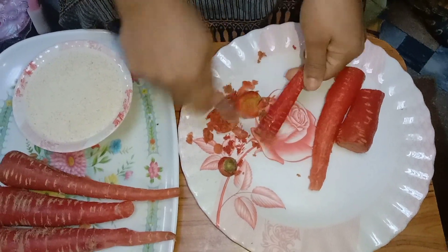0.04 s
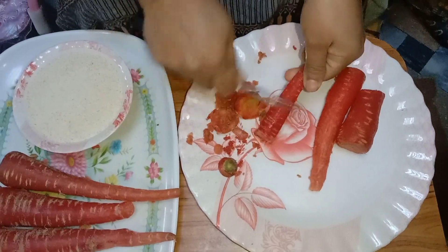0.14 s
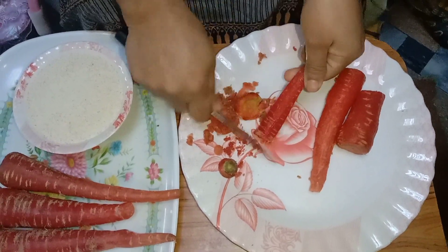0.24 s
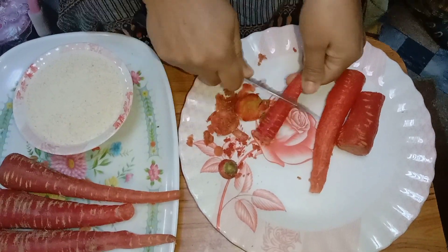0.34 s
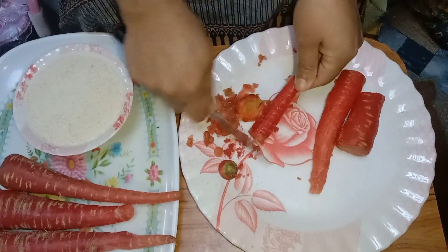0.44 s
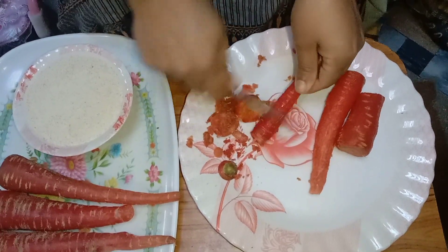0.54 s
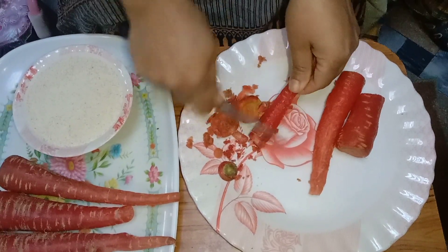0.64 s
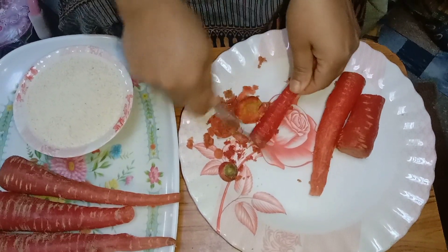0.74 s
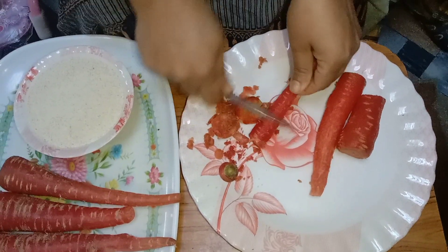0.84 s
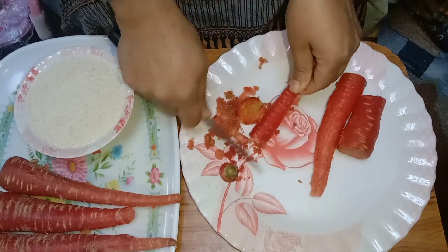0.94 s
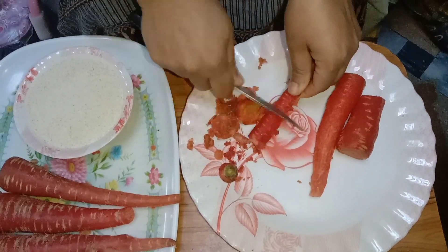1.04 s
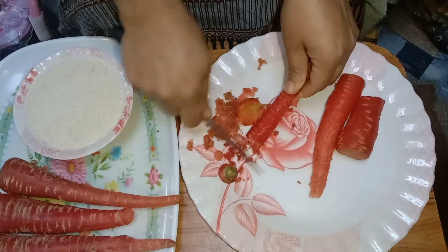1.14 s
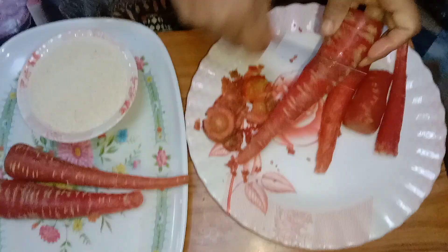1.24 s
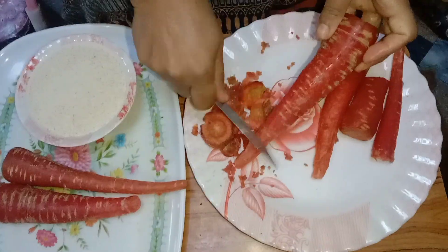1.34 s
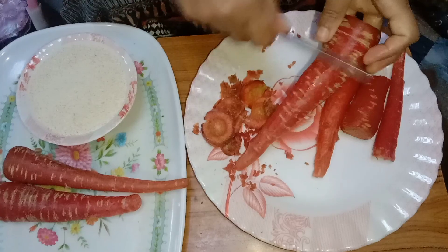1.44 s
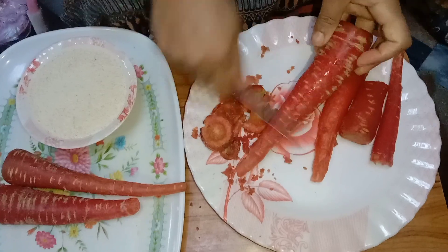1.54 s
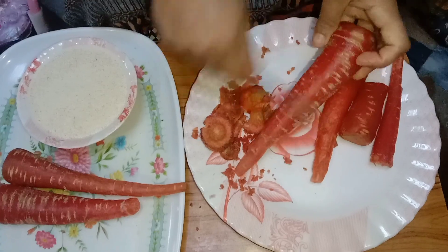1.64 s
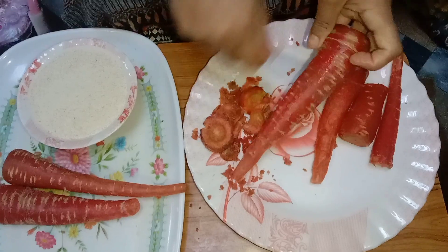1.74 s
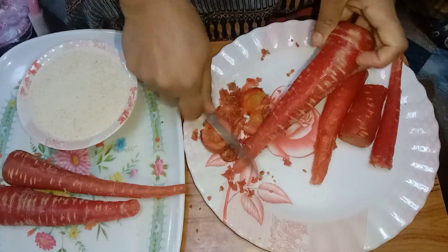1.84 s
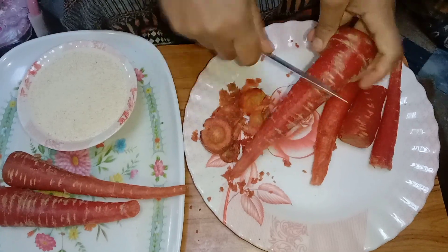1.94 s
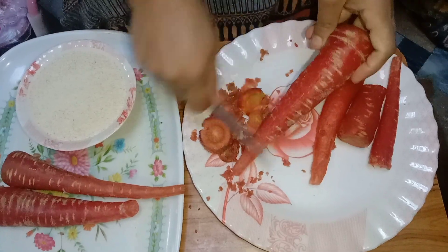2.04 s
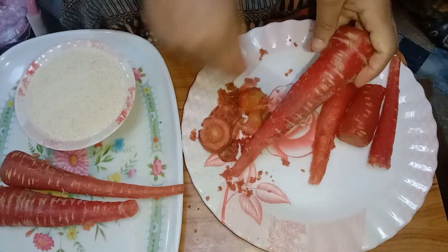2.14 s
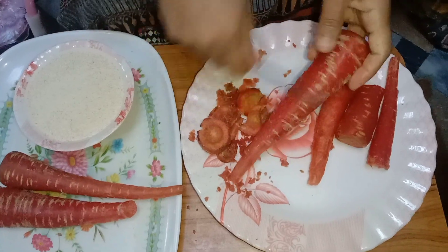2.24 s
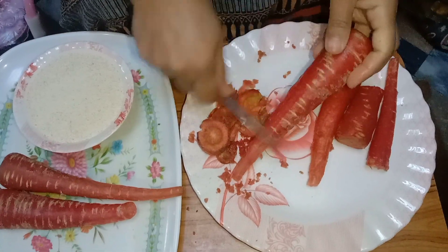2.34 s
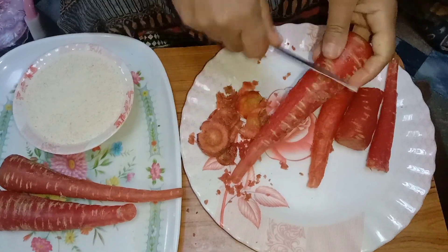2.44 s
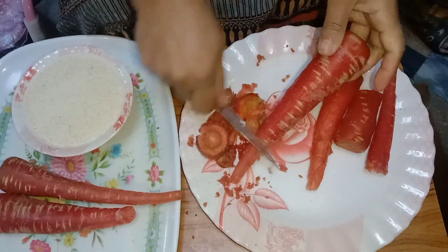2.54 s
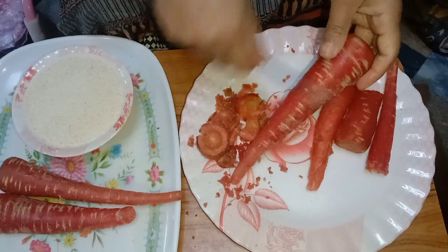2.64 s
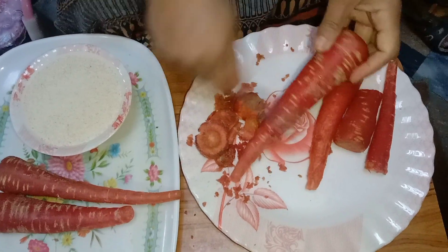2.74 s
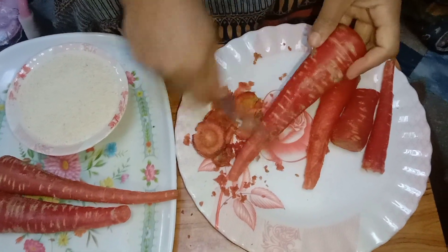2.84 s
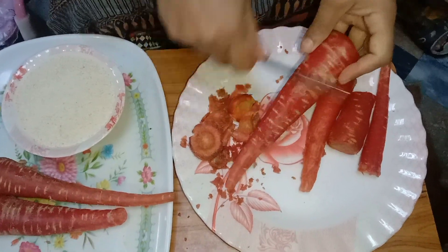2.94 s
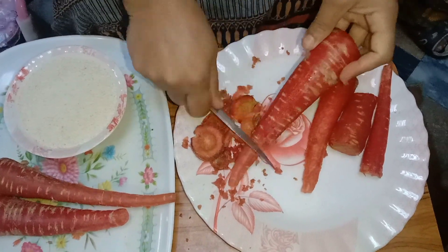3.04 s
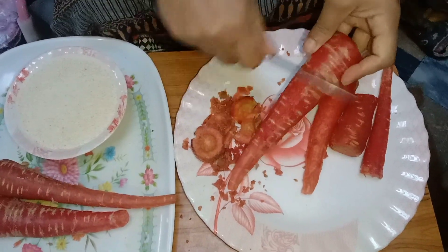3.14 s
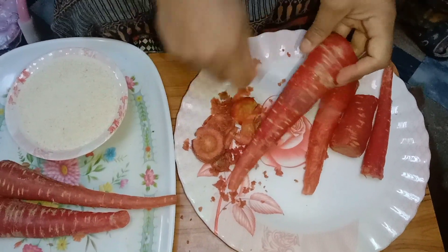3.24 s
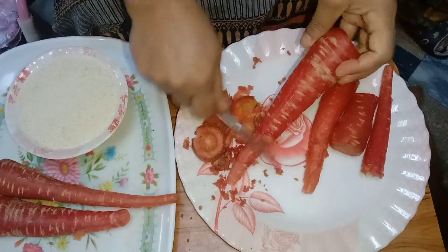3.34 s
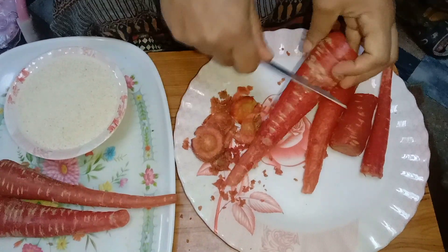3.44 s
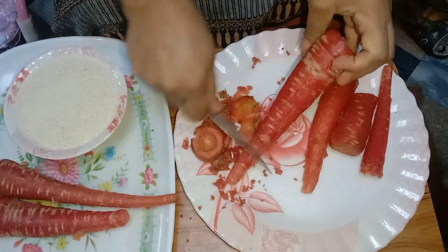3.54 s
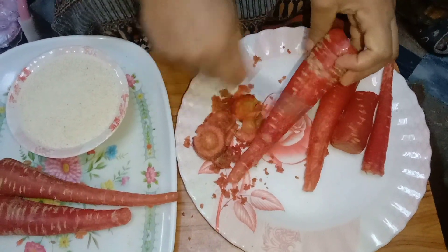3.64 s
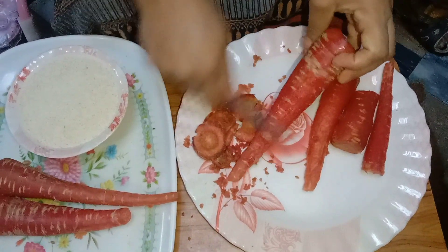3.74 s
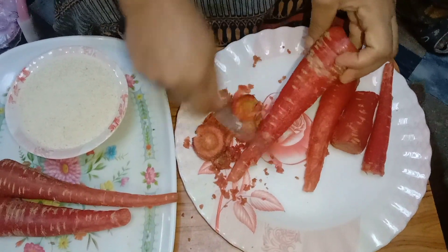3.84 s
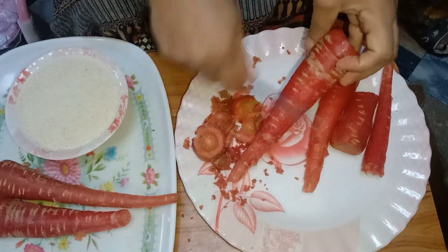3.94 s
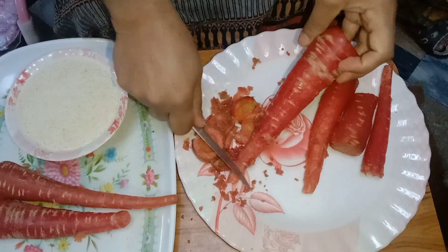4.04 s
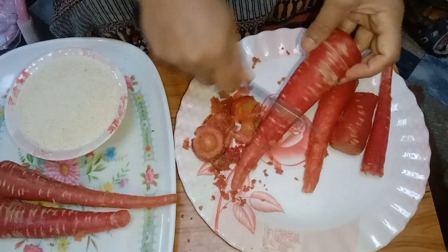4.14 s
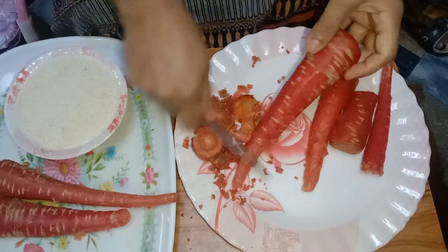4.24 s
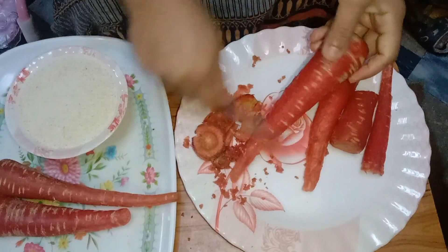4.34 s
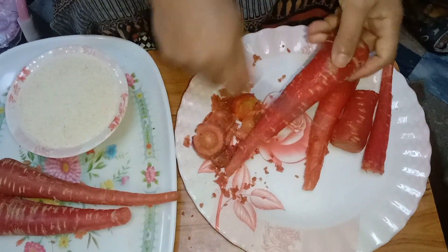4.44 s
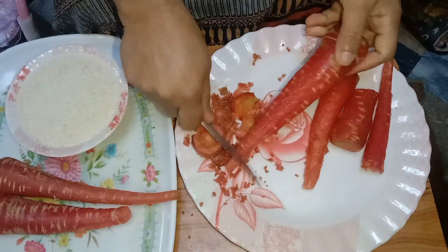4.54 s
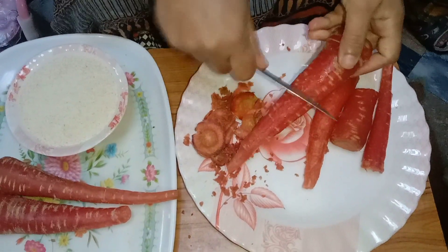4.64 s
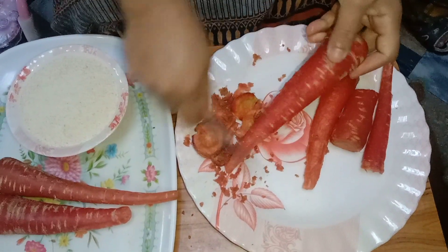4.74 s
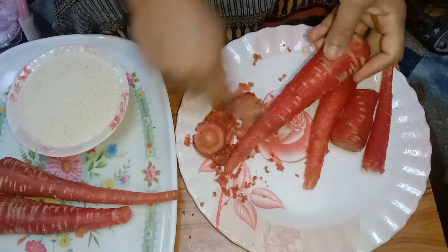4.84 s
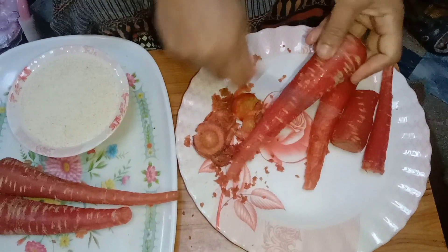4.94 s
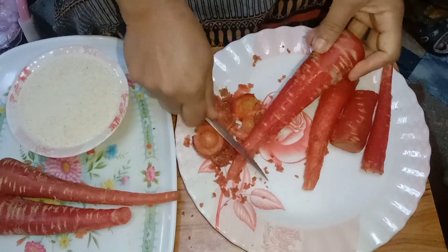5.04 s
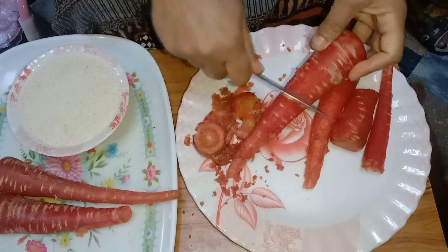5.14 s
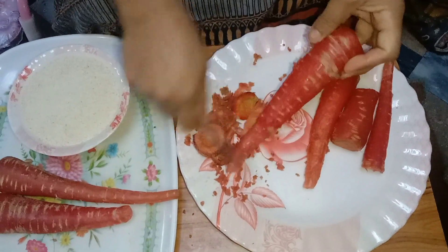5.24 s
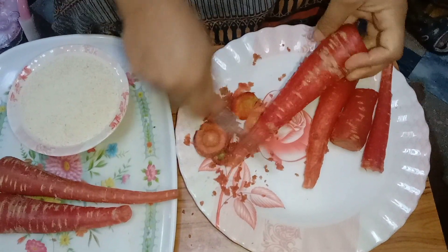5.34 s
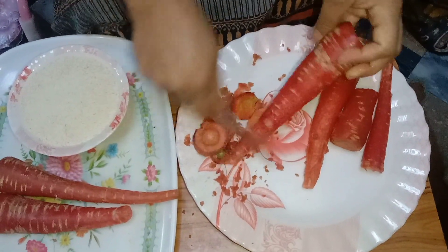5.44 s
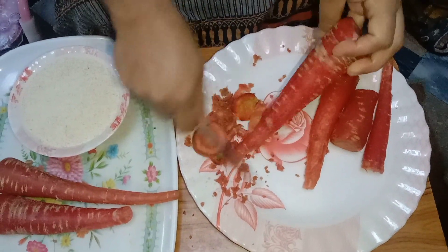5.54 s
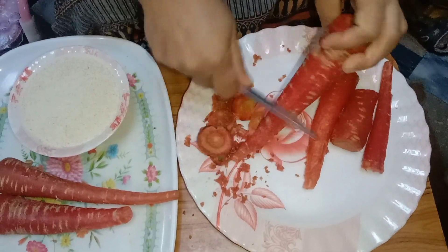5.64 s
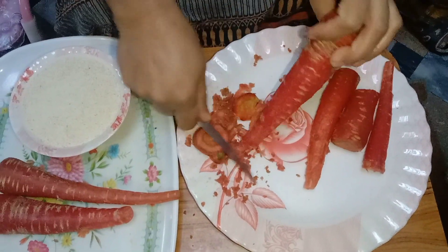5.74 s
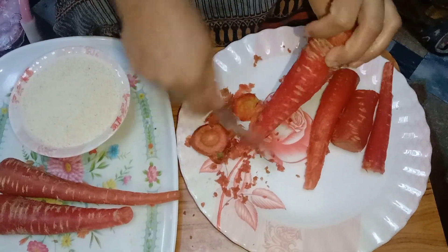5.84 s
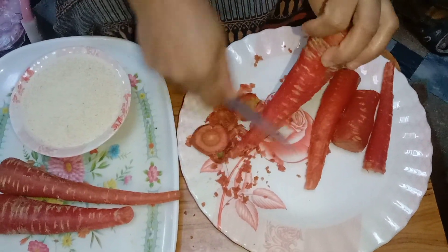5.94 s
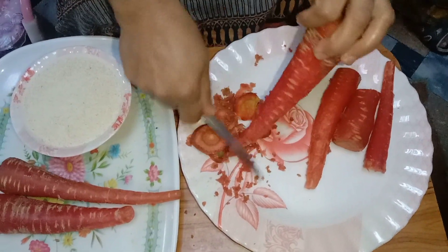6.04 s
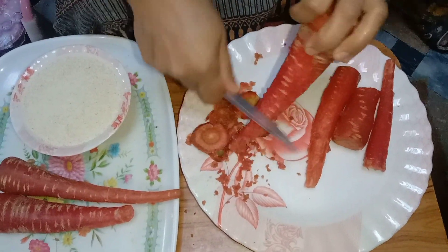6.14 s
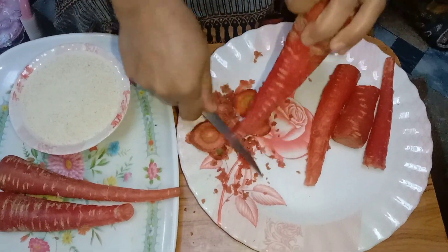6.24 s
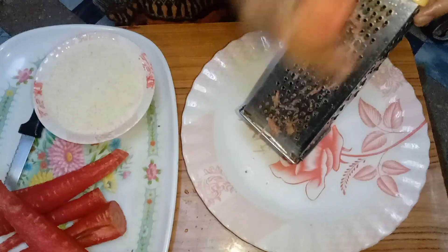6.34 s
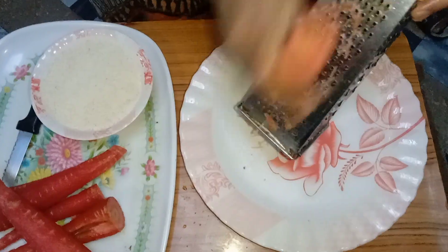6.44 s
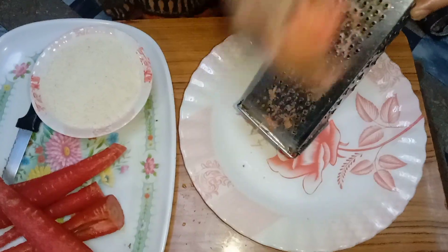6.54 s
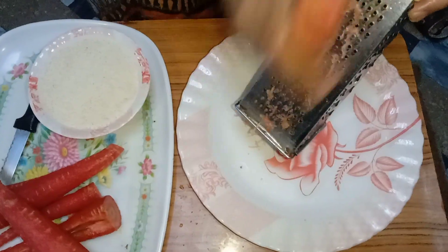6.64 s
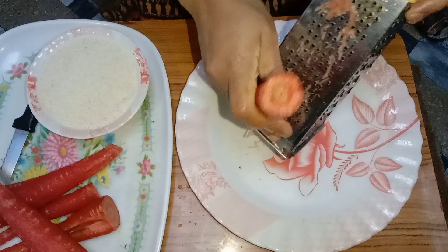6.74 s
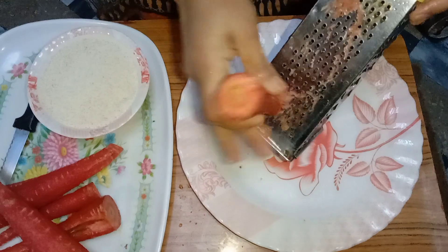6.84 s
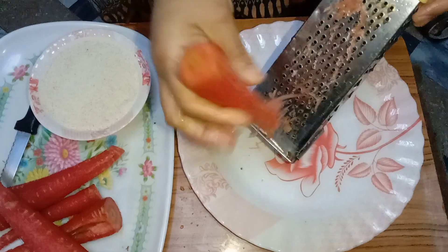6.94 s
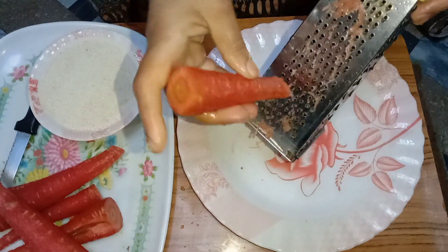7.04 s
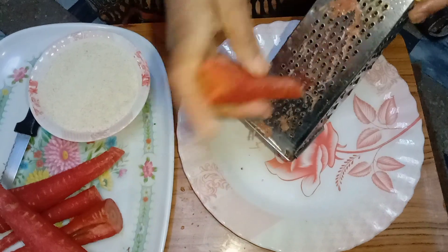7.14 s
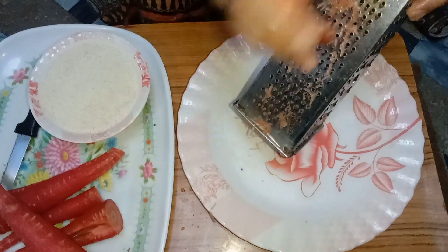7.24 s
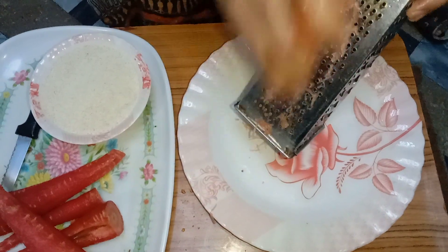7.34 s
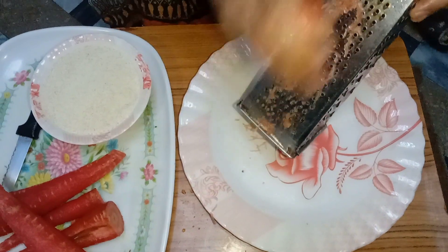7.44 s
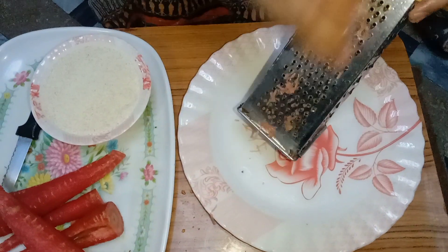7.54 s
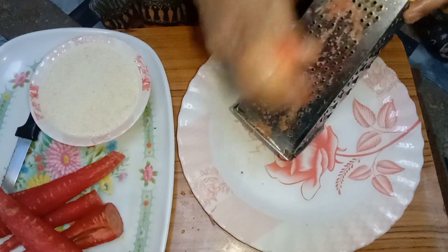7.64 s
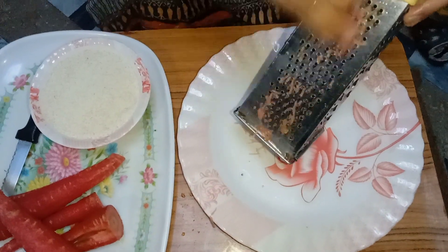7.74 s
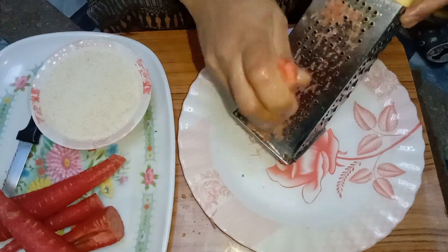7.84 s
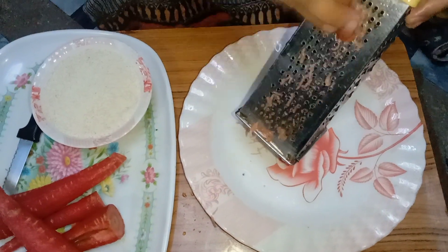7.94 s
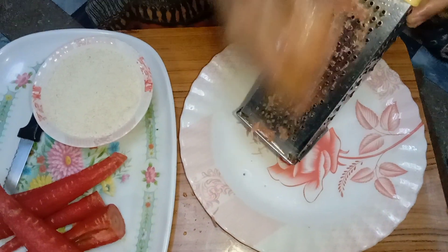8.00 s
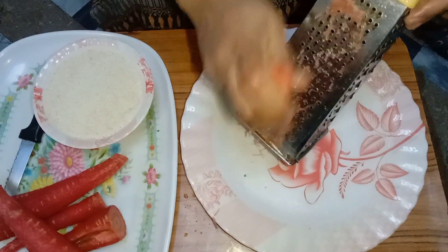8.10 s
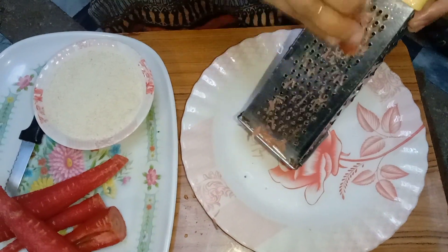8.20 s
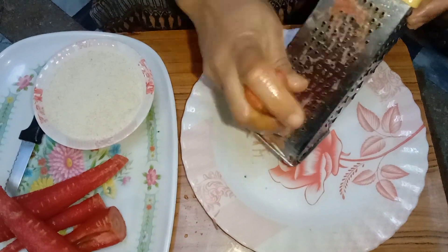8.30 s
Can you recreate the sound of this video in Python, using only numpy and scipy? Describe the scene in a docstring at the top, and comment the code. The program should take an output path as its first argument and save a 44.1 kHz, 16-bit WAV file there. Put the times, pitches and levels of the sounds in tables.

```python
"""A knife scrapes the skin off carrots over a plastic plate, about four strokes a second: torn fibres hiss,
the carrot resonates with the force and the knife's tip rumbles on the plate; light drags and small clicks join in.
Then a carrot is rubbed up and down a sheet-metal grater: noise through the teeth drives the sheet's modes,
and its foot knocks on the plate. Small dry kitchen as decaying noise bands, very low filtered-noise background,
close microphone with a bright resonance."""
import sys
import numpy as np
from scipy import signal
from scipy.fft import rfft, irfft
from scipy.io import wavfile
from scipy.ndimage import uniform_filter1d

SR = 44100
rng = np.random.default_rng(int(sys.argv[2]) if len(sys.argv) > 2 else 0)


def ratio_of_db(decibels):
    """Turn decibels (scalar or array-like) into linear amplitude factors; 0 dB maps to 1."""
    return 10 ** (np.asarray(decibels, float) / 20)


def pcm_store(signal):
    """Save signal as 16-bit PCM."""
    levels = np.round(np.clip(np.atleast_2d(signal), -1, 1) * 32767)
    wavfile.write(sys.argv[1], SR, levels.astype(np.int16).T)


N = 369116


def rms_one(x):
    """Normalisation: scale to unit rms."""
    return x / np.sqrt(np.mean(x ** 2) + 1e-20)


def at_hz(points, hz):
    """Interpolation: read a table on a log-frequency axis."""
    table_hz, values = np.array(points).T
    return np.interp(np.log(np.maximum(hz, 1)), np.log(table_hz), values)


def coloured(x, spectrum, unit=True, size=4096):
    """Minimum-phase filtering: causal filter with the given dB spectrum; unit gain for noise if asked."""
    log_gain = at_hz(spectrum, np.arange(size // 2 + 1) * SR / size) * np.log(10) / 20
    cepstrum = irfft(log_gain)
    cepstrum[1:size // 2] *= 2   # folding the cepstrum forward makes the filter causal
    cepstrum[size // 2 + 1:] = 0
    response = irfft(np.exp(rfft(cepstrum)))
    if unit:
        response = response / np.linalg.norm(response)
    return signal.fftconvolve(x, response)[:N]


def resonate(x, modes):
    """Modal superposition: parallel resonances, unit gain for noise; x may hold one row per mode."""
    out, power = 0, 0
    for k, (hz, width, db) in enumerate(modes):
        r = np.exp(-np.pi * width / SR)
        top = ratio_of_db(db) * (1 - r * r) / 2
        poles = [1, -2 * r * np.cos(2 * np.pi * hz / SR), r * r]
        out = out + (-1) ** k * signal.lfilter([top, 0, -top], poles, x[k % len(x)] + 1e-18)
        power += ratio_of_db(db) ** 2 * np.pi * width / SR
    return out / np.sqrt(power)


def gliding(x, hz, width):
    """Heterodyning: one resonance whose centre follows a curve, gain 1 on top."""
    turn = np.exp(2j * np.pi * np.cumsum(hz) / SR)
    r = np.exp(-np.pi * width / SR)
    return 2 * np.real(turn * signal.lfilter([1 - r], [1, -r], (x + 1e-18) / turn))


def leaky(x, fall_s):
    """Relaxation: a leaky average that dies away exponentially."""
    return signal.lfilter([1 / (fall_s * SR)], [1, 1 / (fall_s * SR) - 1], x)


def drift(rate_hz):
    """Random fluctuation: noise through a two-pole low-pass, with spread 1."""
    r = np.exp(-2 * np.pi * rate_hz / SR)
    return rms_one(signal.lfilter([1], [1, -2 * r, r * r], rng.standard_normal(N + 9000))[9000:])


def friction(per_s, spread_db, chatter_db, chatter_hz):
    """Stick-slip friction: fibres tear as dense uneven clicks; the tool judders, so they come in clumps."""
    sizes = ratio_of_db(spread_db * np.minimum(rng.exponential(1, N), 4)) * rng.choice([-1, 1], N)
    torn = rng.random(N) < per_s / SR
    judder = drift(chatter_hz) - drift(chatter_hz / 4) / 2
    return rms_one(sizes * torn * ratio_of_db(chatter_db * judder))


def bursts(times, levels_db, contact_s, rows):
    """Impact: each blow is a short dying rattle of contacts, with a new strength for every row."""
    out, t = np.zeros((rows, N + 2000)), np.arange(2000) / SR
    envelope = t / contact_s * np.exp(1 - t / contact_s)
    for s, db in zip(times, levels_db):
        rattle = envelope * rng.choice([-1, 1], (rows, len(t)))
        i = round(s * SR)
        out[:, i:i + len(t)] += ratio_of_db(db + 1.2 * rng.standard_normal((rows, 1))) * rattle
    return out[:, :N]


def swells(rows):
    """Loading and release: forces that build up exponentially to a peak and let go."""
    t = np.arange(N) / SR
    return sum(ratio_of_db(db) * np.exp(-np.where(t < s, (s - t) / rise, (t - s) / fall))
               for s, db, rise, fall in rows)


def stroked(s, length, middle_db, gain_db, body_db, arch_db, rise_s, fall_s):
    """Contact force: an arch through each stroke that leans up or down, also weighted for the body."""
    t, tool, body = np.arange(N) / SR, np.zeros(N), np.zeros(N)
    for k in range(len(s)):
        end = s[k] + length[k]
        near = slice(max(round((s[k] - .05) * SR), 0), round((end + .1) * SR))
        onset = np.clip((t[near] - s[k]) / rise_s[k] + .5, 0, 1)
        contact = onset * np.exp(np.minimum(end - t[near], 0) / fall_s)
        arch = np.interp(t[near], [s[k] + 0.0028, end - length[k] / 2, end - .012],
                         [-arch_db - gain_db[k] / 2, 0, -arch_db + gain_db[k] / 2])
        shape = contact ** 2 * ratio_of_db(arch)
        tool[near] += shape * ratio_of_db(middle_db[k])
        body[near] += shape * ratio_of_db(body_db[k])
    return tool, body


def follows(db, level_db, share):
    """Partial coupling: a part follows only a share of the swing of its cause around -26 dB."""
    return level_db + share * (db + 26.0)


def mirrored(x, lag_s, wander, share):
    """Comb filtering: the plate throws the sound back; the path changes as the hand moves, so notches glide."""
    lag = lag_s * SR * np.exp(wander * drift(5))
    reflection = np.interp(np.arange(N) - lag, np.arange(N), x)
    return (x + share * reflection) / np.sqrt(1 + share ** 2)


# Spectrum of the background. Each row: frequency in Hz, relative level in dB.
ROOM_TONE = [(24, -36.5), (40, -15.5), (87, 5.5), (250, -9.5), (646, -10.5), (1440, -2.5), (2600, -15),
             (5500, -15), (16000, -6.5)]


def room_tone():
    """Stationary noise: a faint coloured background whose level wanders slightly."""
    return ratio_of_db(-60 + 2.0 * drift(5)) * coloured(rng.standard_normal(N), ROOM_TONE)


# Reverberation of the kitchen. Each row: frequency in Hz, time to fall by 60 dB in seconds.
ROOM_T60 = [(200, 0.33), (1500, 0.41), (6000, 0.3), (14000, 0.13)]


def room(x, wet_db):
    """Diffuse reverberation: octave bands of noise, each dying at its own rate."""
    t, tail = np.arange(SR // 2) / SR, 0
    for low in 100 * 2. ** np.arange(8):
        band = signal.butter(2, [low, min(2 * low, .45 * SR)], "band", fs=SR, output="sos")
        decay = ratio_of_db(-60 * t / at_hz(ROOM_T60, 2.0 * low))
        tail = tail + signal.sosfilt(band, rng.standard_normal(len(t)) * decay * (t > .004))
    return ratio_of_db(wet_db) * signal.fftconvolve(x, tail / np.linalg.norm(tail))[:N]


# Resonances of the plastic plate. Each row: frequency in Hz, width in Hz, relative level in dB.
PLATE = [(249.7, 27, 5.5), (321, 25.4, 4), (408, 115, -4.5)]


def plate(force):
    """Plate radiation: a light plate rings low but radiates little deep bass."""
    radiated = signal.butter(2, [165, 470], "band", fs=SR, output="sos")
    return signal.sosfilt(radiated, resonate(force, PLATE))


# Thumps of the table under the grater. Each row: peak in seconds, level in dB, rise and fall in seconds.
THUMPS = [(6.44, -39, 0.0058, 0.04), (6.76, -40, 0.051, 0.13), (7.74, -55, 0.066, 0.021),
          (8.05, -57, 0.13, 0.041)]
# Resonances of the table. Each row: frequency in Hz, width in Hz, relative level in dB.
TABLE = [(55.15, 14, -7), (123, 48, 1)]


def table_thumps():
    """Forced vibration: noise under slow swells of force drives the table's low resonances."""
    return resonate([swells(THUMPS) * rng.standard_normal(N)], TABLE)


# Spectrum of steel contacts. Each row: frequency in Hz, relative level per Hz in dB.
TEETH = [(1300, -19), (2200, -13), (2700, -8), (3100, -3.5), (4100, -2.5), (5800, 3), (7000, -7),
         (13000, 1.5)]


def steel_colour(x):
    """Spectral shaping: the bright colour shared by the grater's teeth and the small steel clicks."""
    return coloured(x, TEETH)


# Small clicks between strokes and at the start of some; the last row is no click but makes the sound begin #
# abruptly where the long carrot begins. Each row: start in seconds, level in dB, brightness in dB.
TICKS = [(0.762, -37, -5.5), (1.594, -50, -1.5), (2.088, -51, 2), (2.33, -53, 6.5), (5.793, -42, -7),
         (6.218, -31.5, -26), (1.381, -36, -4)]


def ticks():
    """Light impact: small clicks with a bright part from the steel and a dull part from the carrot."""
    s, db, bright_db = np.transpose(TICKS)
    steel = steel_colour(bursts(s, db + bright_db + 0.5, 0.003, rows=1)[0])
    return steel + resonate(bursts(s, db - 5.5, 0.00029, rows=1), [(1600, 700, 0)])


# Blade dragged lightly back up the carrot.
# Each row: start in seconds, length in seconds, level in dB, resonance of the hollow in Hz.
DRAGS = [(0.0, 0.18, -44, 2530), (0.39, 0.084, -50.5, 1900), (0.592, 0.13, -44, 2430),
         (0.872, 0.14, -52, 2430), (1.072, 0.16, -42.5, 2600), (2.536, 0.088, -47.5, 2440),
         (2.756, 0.11, -48, 1740), (2.954, 0.25, -56.5, 2180), (3.453, 0.19, -57.5, 2182),
         (3.7, 0.18, -53.5, 2400), (4.02, 0.12, -61, 2395), (4.216, 0.28, -48.5, 2870),
         (4.464, 0.13, -40.5, 2130), (5.035, 0.23, -47, 1426), (5.43, 0.11, -50, 2386),
         (5.884, 0.12, -49.5, 2410)]


def drags():
    """Cavity resonance: smooth friction sounds in the hollow between blade and carrot, plus edge hiss."""
    out, noise = np.zeros(N), rng.standard_normal(N) * ratio_of_db(1.3 * drift(25))
    for s, length, db, hollow_hz in DRAGS:
        near = slice(round(s * SR), round((s + length) * SR))
        count = near.stop - near.start
        fading = ratio_of_db(db + np.linspace(0, -10.5, count))   # dies away along its length
        rubbed = fading * np.hanning(count) ** 0.058 * noise[near]
        out[near] += resonate([rubbed], [(1100, 800, -5), (hollow_hz, 1600, 0), (3700, 1500, -4),
                                         (5600, 2500, -6), (14500, 5000, -1)])
    return mirrored(out, lag_s=.0007, wander=0.32, share=0.07)


# Resonances of the grater's sheet. Each row: frequency in Hz, width in Hz, relative level in dB.
GRATER = [(233.8, 5, -1), (398, 38, -4), (759, 47, 0), (845, 21, -5), (1095, 140, -7.5), (1278, 39, -8),
          (1410, 27, 1.5), (1567, 36, -4.5), (1758, 45, 0), (3070, 140, -5), (3304, 110, -12)]
LOW_MODES = np.array(GRATER)[:, :1] < 900


def bent_sheet(force):
    """Stress-shifted modes: the grater's resonances each slide a little as the hand presses."""
    out, power = 0, 0
    for k, (hz, width, db) in enumerate(GRATER):
        bent_hz = hz * np.exp(.04 * drift(3.9))
        out = out + (-1) ** k * ratio_of_db(db) * gliding(force[k], bent_hz, width)
        power += ratio_of_db(db) ** 2 * np.pi * width / SR
    return out / np.sqrt(power)


# Strokes on the grater, strong ones down and light ones back. Each row: start in seconds,
# length in seconds, teeth hiss at mid-stroke in dB, gain from start to end in dB.
RUBS = [(6.42, 0.088, -28.5, -13), (6.505, 0.075, -19.5, 1.5), (6.604, 0.088, -30.5, 14.5),
        (6.716, 0.088, -19.5, 4.5), (6.87, 0.061, -38, -38), (7.431, 0.058, -26.5, 6), (7.514, 0.1, -35, 4),
        (7.64, 0.076, -22.5, 10.5), (7.735, 0.11, -32, 16.5), (7.868, 0.076, -20.5, 9),
        (7.968, 0.1, -31.5, 9), (8.086, 0.09, -20, 5), (8.173, 0.13, -34.5, 17), (8.316, 0.043, -19.5, 11)]
SHEET_DB, SHEET_FOLLOWS = -34, 0.51   # sheet level at a -26 dB stroke; share of the teeth's swing


def rubbing():
    """Friction excitation: teeth shred the carrot and the same force drives the sheet and shakes the foot."""
    s, length, db, gain_db = np.transpose(RUBS)
    rise_s = np.where(np.diff(s, prepend=0) > .3, .004, .02)   # abrupt start after a pause
    teeth, sheet = stroked(s, length, db, gain_db, follows(db, SHEET_DB, SHEET_FOLLOWS),
                           arch_db=7.5, rise_s=rise_s, fall_s=0.016)
    lagging = uniform_filter1d(sheet, size=1500, origin=600)
    shake = ratio_of_db(-16.0) * lagging * friction(1500, spread_db=3.0, chatter_db=7.5, chatter_hz=30)
    teeth = ratio_of_db(0.5) * teeth * friction(15000, spread_db=-1.0, chatter_db=1.5, chatter_hz=149)
    sheet = sheet * friction(5000, spread_db=1.0, chatter_db=2.5, chatter_hz=60)
    # +1 on strong strokes, -1 on light ones: the low sheet modes are freer on light strokes
    pressed = np.interp(np.arange(N) / SR, s + length / 2, np.sign(db - db.mean()))
    wander = np.array([drift(11) for _ in GRATER])
    return teeth, sheet * ratio_of_db(2.74 * wander - 7 * LOW_MODES * pressed), shake


# Grater knocking on the plate. Each row: start in seconds, level in dB,
# treble relative to it in dB, plate thud relative to it in dB.
KNOCKS = [(6.421, -28, -19, -12), (6.587, -12, -12.5, -9), (6.665, -31.5, 0, -8), (6.797, -28.5, -7.5, -17),
          (6.874, -13.5, -34, -9), (7.413, -55.5, 6, -19.5), (7.494, -11.5, -5, -8),
          (7.717, -16, -20.5, -12), (7.758, -21, -29, -7), (7.897, -34, -6, -16), (7.928, -16.5, -2.5, -34),
          (8.023, -21.5, -21, -3), (8.148, -15.5, 1, -22), (8.194, -16, -27.5, -11)]


def knocking():
    """Impact excitation: every knock gives a dry clack, a crack of treble, sheet blows and a plate thud."""
    s, db, treble_db, thud_db = np.transpose(KNOCKS)
    # the knocks strike the low sheet modes less
    blows = bursts(s, db + 1.5, 0.00085, rows=len(GRATER)) * ratio_of_db(-3.5 * LOW_MODES)
    clack = resonate(bursts(s, db, 0.0028, rows=2), [(1110, 516, -0.036), (1440, 320, -2)])
    crack = bursts(s, db + treble_db, 0.0011, rows=1)[0]
    thud = bursts(s, db + thud_db, 0.00069, rows=len(PLATE))
    return clack, crack, blows, thud


def grater():
    """Coupled vibration: rubbing and knocking drive the same sheet and plate, over table thumps."""
    teeth, sheet, shake = rubbing()
    clack, crack, blows, thud = knocking()
    hiss = mirrored(steel_colour(teeth + crack), lag_s=0.00052, wander=0.41, share=0.4)
    return hiss + clack + bent_sheet(sheet + blows) + plate(shake + thud) + table_thumps()


CARROT_CHANGE_S = 1.372   # a short carrot before, a long one after
SHORT = np.arange(N) < CARROT_CHANGE_S * SR
# Short bursts, some negligible, of the edge's hiss.
# Each row: time in seconds, height of the burst in dB.
EDGE_BURSTS = [(.104, 20), (1.42, 0), (1.432, 5), (1.672, 3.5), (3.373, 6), (3.406, 5.5), (3.636, 1),
               (3.917, 12), (4.128, -1), (4.141, 11), (4.336, 5), (4.381, 13.5), (5.386, -0.5)]
# Near the tip the blade skips and briefly leaves the skin.
# Each row: time in seconds, level relative to the stroke in dB, half length in seconds.
SKIPS = [(5.834, -15, 0.0015), (5.849, -5, 0.0022), (5.879, -12.5, 0.0028), (6.098, -11, 0.0025),
         (6.118, -14, 0.0022), (6.294, -35, 0.006), (6.317, -25, 0.0013), (6.338, -22, 0.0011)]


def edge_flicker():
    """Amplitude modulation: Gaussian bumps and dips, in dB, of the edge's level."""
    t, flicker_db = np.arange(N) / SR, np.zeros(N)
    short_bursts = [(at, db, .0022) for at, db in EDGE_BURSTS]
    for at, more_db, half_s in short_bursts + list(SKIPS):
        near = slice(round((at - .02) * SR), round((at + .02) * SR))
        flicker_db[near] += more_db * np.exp(-((t[near] - at) / half_s) ** 2)
    return flicker_db


# Spectrum of the knife's edge. Each row: frequency in Hz, relative level per Hz in dB.
EDGE = [(1300, -46), (2200, -12), (3400, -6.5), (5200, -0.5), (6000, -5.5), (6700, -4), (11000, 0.5),
        (14800, 8)]


def edge_hiss(edge, progress):
    """Friction noise through a gliding resonance: the blade's ring climbs in strokes on the long carrot."""
    torn = edge * friction(11000, spread_db=4.0, chatter_db=3.0, chatter_hz=70)
    hiss = coloured(ratio_of_db(3.0) * torn, EDGE)
    blade_hz = np.where(SHORT, 5200, 6090 + progress * (6300 - 6090))
    return hiss + ratio_of_db(5.5) * gliding(hiss, blade_hz * np.exp(0.013 * drift(14.0)), width=1130)


def sliding_off(edge):
    """Relaxing friction: the blade slides off softly after each stroke."""
    trail = ratio_of_db(-22) * 3.6 * leaky(edge, .036) * rng.standard_normal(N)
    return resonate([trail], [(2600, 2800, 3.5), (5560, 5600, -5), (11000, 7800, 3.0)])


def brushing(edge):
    """Lingering friction: the blade keeps brushing the thick part of the long carrot."""
    tip_from_s = 4.6   # from here the blade works near the thin tip and lifts clear between strokes
    thick = edge * ~SHORT * (np.arange(N) / SR < tip_from_s)
    linger = ratio_of_db(-19) * leaky(thick, .15) * rng.standard_normal(N)
    return resonate([linger], [(1600, 1400, 2.5), (2900, 1600, -1), (5600, 2600, -10.5)])


# Resonances of the short and the long carrot. Each row: frequency in Hz, width in Hz, relative level in dB.
SHORT_CARROT = [(660, 110, -13.5), (1084, 180, -19), (1290, 250, -24.5), (1850, 45, -29),
                (2940, 470, -29.5), (14800, 1200, -18.5)]
CARROT = [(794, 79, -12), (1015, 317, -2), (1716, 226, -3), (1815, 97, 0)]


def carrot_body(force, knock):
    """Body resonance: friction force drives the carrot; the short one also knocks along with its tip."""
    force = np.where(SHORT, 0.69 * force + 2.5 * knock, force)
    force = force * friction(3000, spread_db=-7.0, chatter_db=0.5, chatter_hz=60.6)
    long_rows = [force * ~SHORT * ratio_of_db(drift(8.7)) for _ in CARROT]
    return resonate([force * SHORT], SHORT_CARROT) + resonate(long_rows, CARROT)


def tip_rumble(push):
    """Forced plate vibration: the tip's push rumbles, and the plate keeps rocking afterwards."""
    push = push + 0.084 * leaky(push, .05)
    return plate([ratio_of_db(2.0) * push * friction(1500, spread_db=3.0, chatter_db=0.0, chatter_hz=29.8)])


# Knife strokes. Each row: start in seconds, length in seconds, edge hiss at mid-stroke in dB,
# gain from start to end in dB, push of the tip on the plate in dB.
STROKES = [(0.0, 0.16, -44, -5.5, -48.5), (0.319, 0.069, -41.5, -0.5, -41.5),
           (0.534, 0.094, -46, 10, -42.5), (0.752, 0.13, -46, -2, -33), (1.036, 0.053, -41, 11, -38),
           (1.252, 0.084, -45, 5, -41), (1.383, 0.082, -28.5, -5.5, -35.5),
           (1.627, 0.099, -28.5, -5.5, -37.5), (1.859, 0.1, -33, 10, -45), (2.125, 0.079, -30.5, 0.5, -47),
           (2.377, 0.092, -32.5, -2, -44), (2.615, 0.1, -31, -11, -39), (2.859, 0.092, -26.5, -5, -35.5),
           (3.104, 0.085, -28.5, -2, -46.5), (3.348, 0.086, -28.5, 2, -42), (3.585, 0.098, -30.5, 9.5, -38),
           (3.842, 0.09, -29, -1.5, -39), (4.075, 0.09, -30, 0.5, -41), (4.318, 0.097, -31, -7, -42),
           (4.578, 0.095, -29, -2, -48), (4.828, 0.082, -34, 3, -47), (5.082, 0.085, -29.5, 5.5, -43.5),
           (5.327, 0.097, -31, 5, -39.5), (5.565, 0.1, -40, 12, -40), (5.817, 0.11, -36, -12, -58),
           (6.048, 0.074, -32, 15.5, -56.5), (6.273, 0.079, -31, -1.5, -48)]
# body level at a -26 dB stroke; share of the edge's swing
SHORT_CARROT_DB, LONG_CARROT_DB, CARROT_FOLLOWS = -39.5, -37.5, 0.73


def knife():
    """Friction-driven resonators: the edge hisses, the carrot sounds with the force, its tip rumbles."""
    s, length, db, gain_db, push_db = np.transpose(STROKES)
    on_short = s < CARROT_CHANGE_S
    body_db = follows(db, np.where(on_short, SHORT_CARROT_DB, LONG_CARROT_DB), CARROT_FOLLOWS)
    rise_s = np.where(on_short, .016, .012)   # the blade bites faster into the long carrot
    edge, body = stroked(s, length, db, gain_db, body_db, arch_db=8.5, rise_s=rise_s, fall_s=0.0022)
    slide = sliding_off(edge)
    flicker_db = edge_flicker()
    edge = edge * ratio_of_db(flicker_db)
    body = uniform_filter1d(body, size=700, origin=300) * ratio_of_db(flicker_db / 2)   # the body lags the edge
    stroke_ends = np.ravel([s, s + length], order="F")
    progress = np.interp(np.arange(N) / SR, stroke_ends, np.tile([0, 1], len(s)))
    push_s = s + 0.82 * length   # the push peaks late in the stroke
    push = swells([(at, level, 0.03, 0.013) for at, level in zip(push_s, push_db)])
    knock = swells([(at, level, .008, .008) for at, level in zip(push_s, push_db)])
    near_plate = edge_hiss(edge, progress) + slide + brushing(edge) + carrot_body(body, knock)
    return mirrored(near_plate, lag_s=0.000637, wander=0.3494, share=0.69) + tip_rumble(push)


def scene():
    """Superposition: both jobs in the same spot over a faint room tone; the level dips briefly once."""
    peeling, grating = knife() + drags() + ticks(), grater()
    kitchen = room(peeling, wet_db=-13.0) + room(grating, wet_db=-11.0)
    t = np.arange(N) / SR
    dip_s, dip_length_s, dip_db, ramp_s = 8.181, 0.01, -17, 0.00076
    inside = np.minimum(t - dip_s, dip_s + dip_length_s - t)
    dip = ratio_of_db(dip_db * np.clip(inside / ramp_s + .5, 0, 1))
    return (dip * (peeling + grating + kitchen + room_tone()))[None]


def suppress(x, margin_db, least_db, size=768):
    """Spectral subtraction: bands lose power set by their quietest moments; tails break into thin patches."""
    hz, s, cells = signal.stft(x, SR, nperseg=size, noverlap=size * 3 // 4)
    power = uniform_filter1d(np.abs(cells) ** 2, size=7, axis=1) + 1e-20
    noise = uniform_filter1d(np.percentile(power, 4, axis=1), size=9)[:, None]
    gain = np.maximum(1 - ratio_of_db(margin_db) ** 2 * noise / power, ratio_of_db(least_db))
    return signal.istft(cells * gain, SR, nperseg=size, noverlap=size * 3 // 4)[1][:N]


# Response of the microphone. Each row: frequency in Hz, gain in dB.
MICROPHONE = [(3700, 1.5), (4300, -5.5), (4750, 3.5), (7000, 8.5), (7500, -0.5), (8300, -8.5),
              (15300, -9.5), (15900, -28), (17000, -94.5)]


def microphone(x):
    """Transducer response: the microphone's bright resonance and steep treble loss."""
    return coloured(x, MICROPHONE, unit=False)


def low_pass(x):
    """Removes everything above the highest recorded frequency."""
    return signal.sosfilt(signal.butter(12, 16860, fs=SR, output="sos"), x)


def record(dry):
    """Signal chain: microphone colour, saturation of peaks, low cut, noise suppressor."""
    heard = microphone(dry[0])
    rounded = .62 * np.tanh(heard / .62)
    cut = signal.sosfilt(signal.butter(2, 50, "high", fs=SR, output="sos"), rounded)
    cleaned = suppress(cut, margin_db=8, least_db=-19)
    return low_pass(cleaned[None])


dry = scene()
out = record(dry)
pcm_store(out)
```